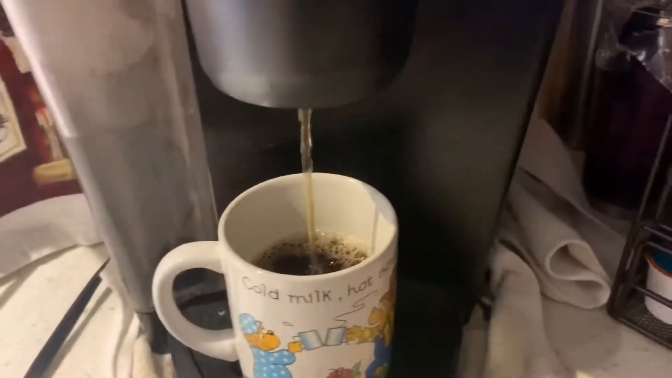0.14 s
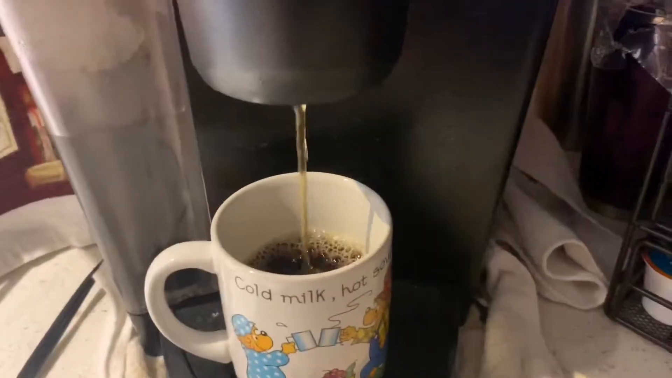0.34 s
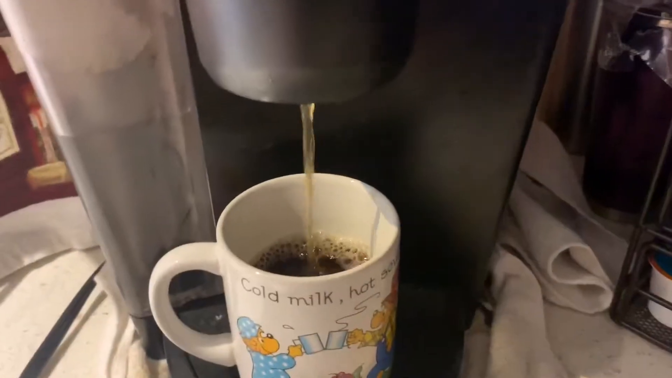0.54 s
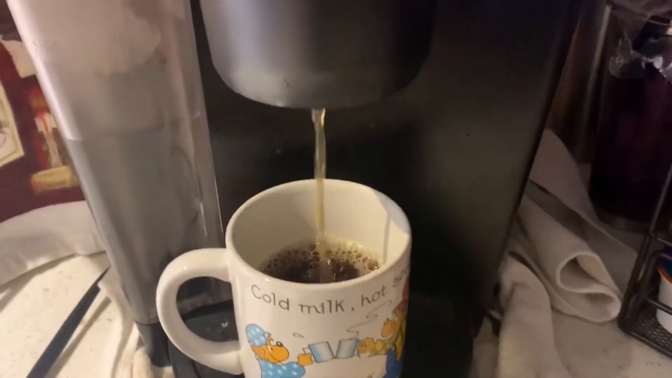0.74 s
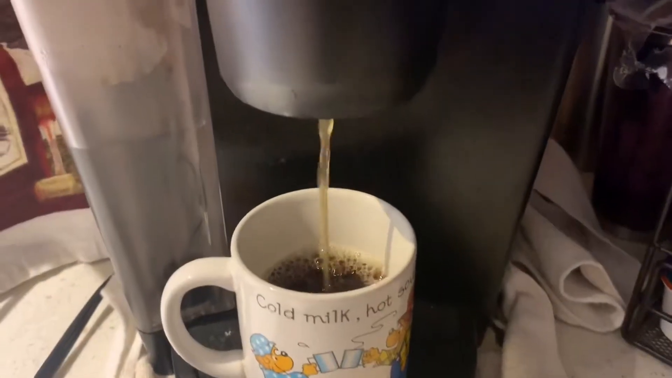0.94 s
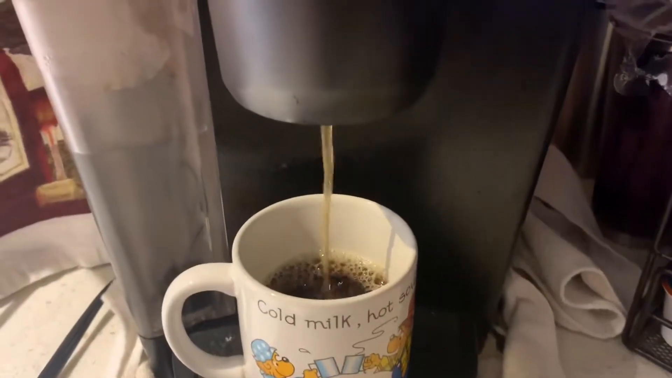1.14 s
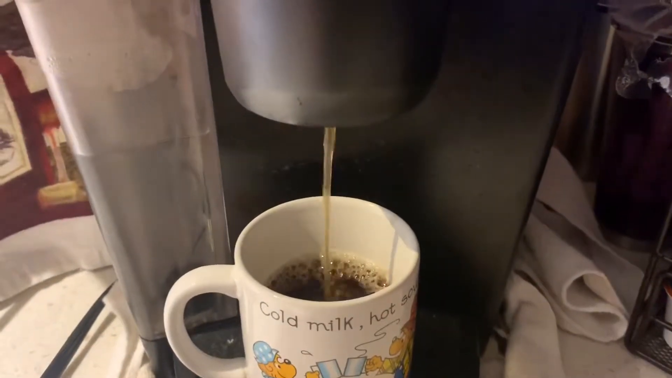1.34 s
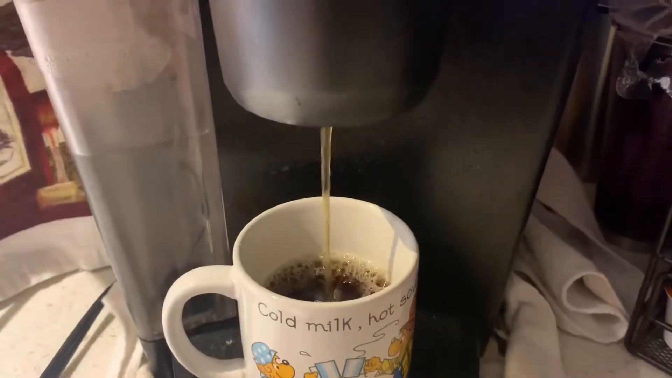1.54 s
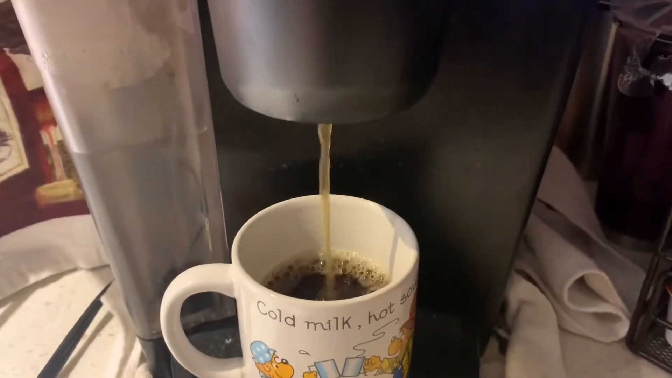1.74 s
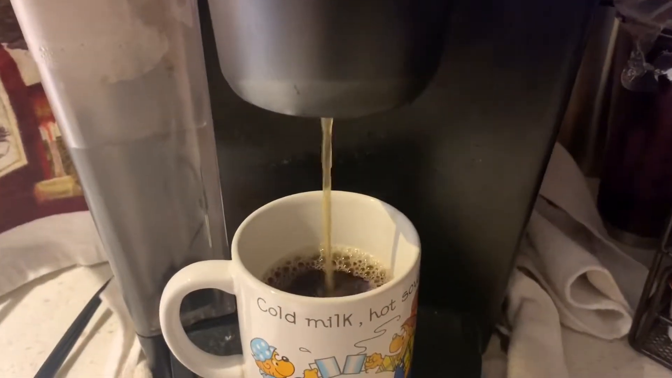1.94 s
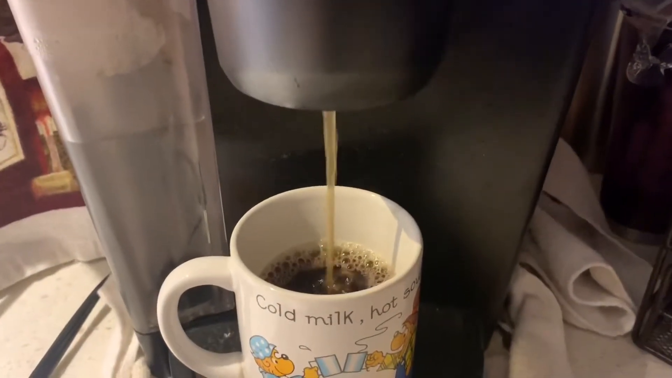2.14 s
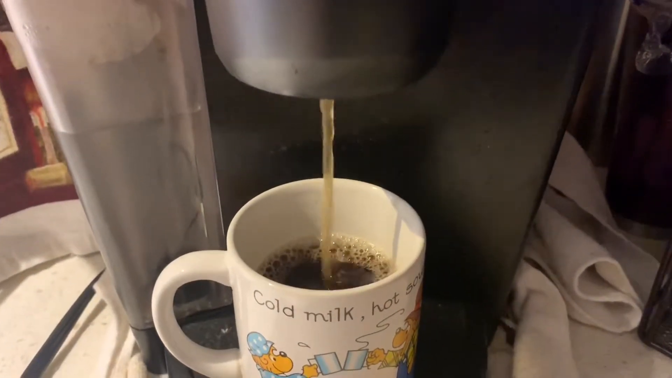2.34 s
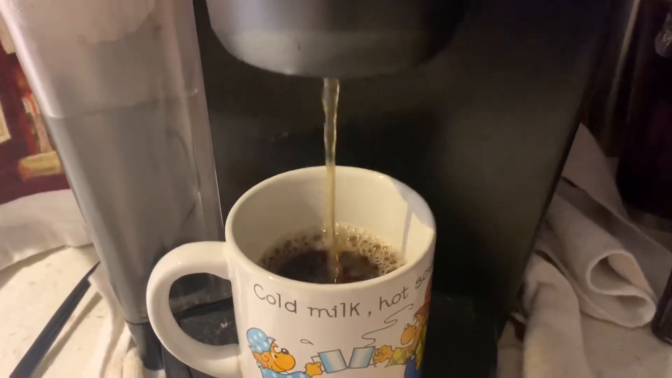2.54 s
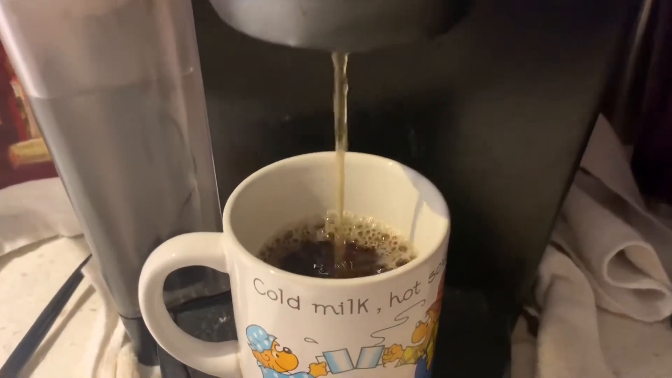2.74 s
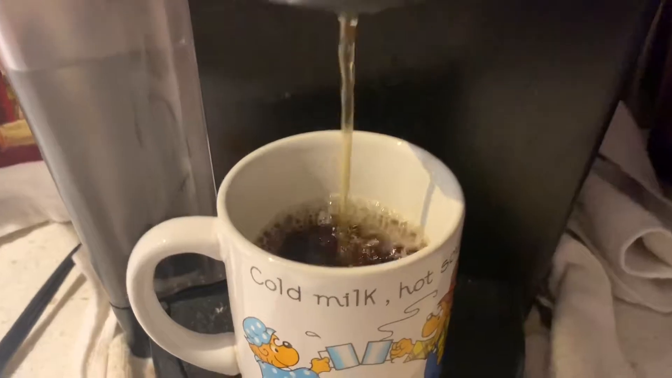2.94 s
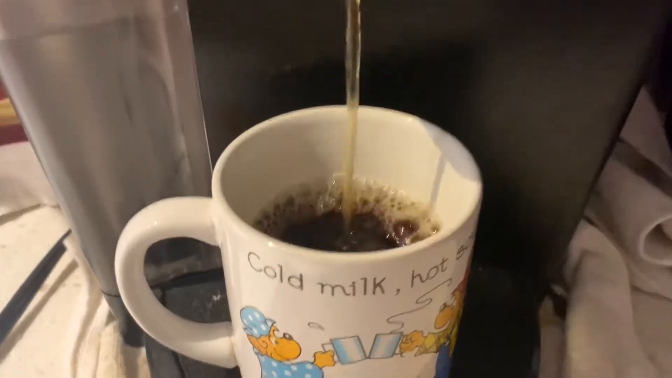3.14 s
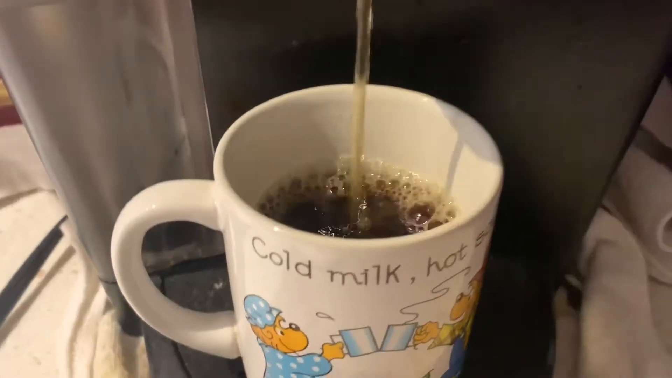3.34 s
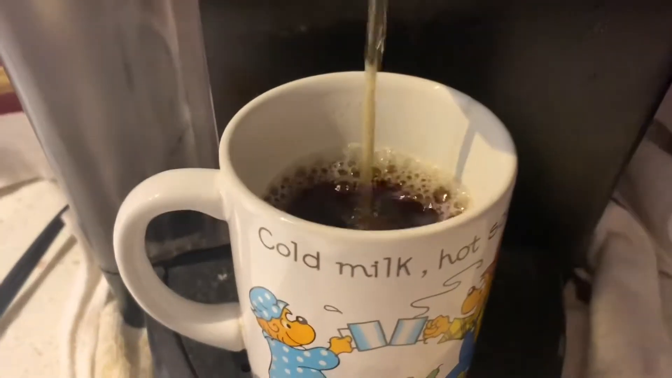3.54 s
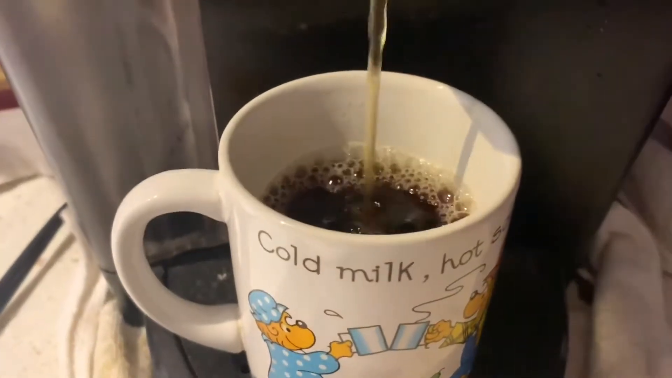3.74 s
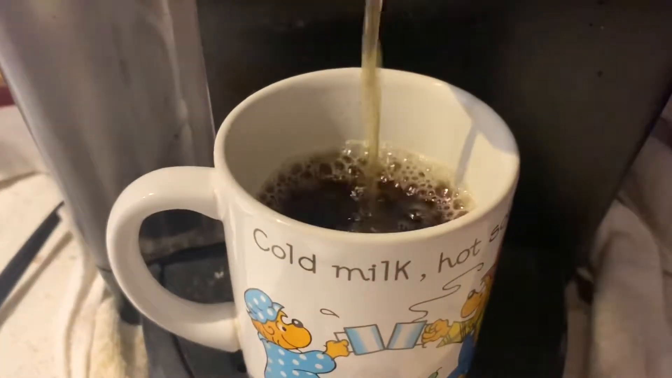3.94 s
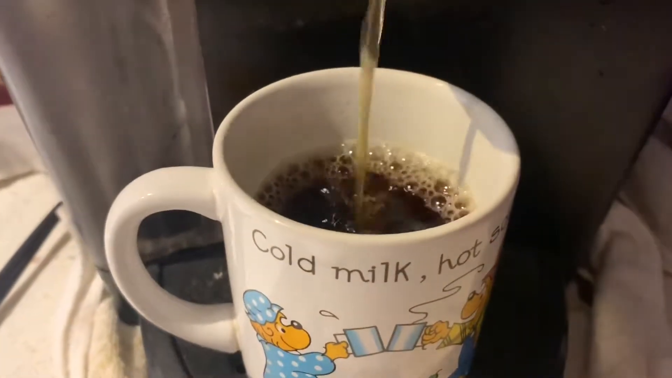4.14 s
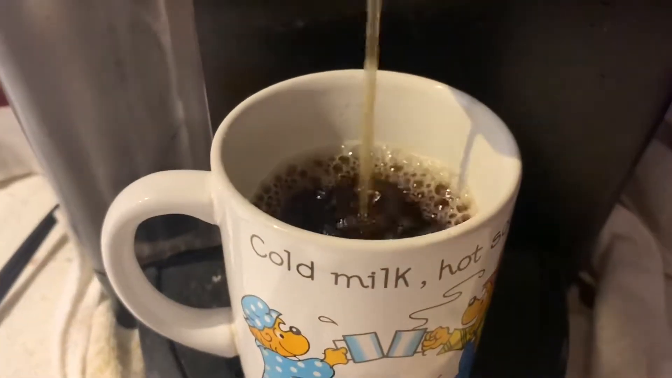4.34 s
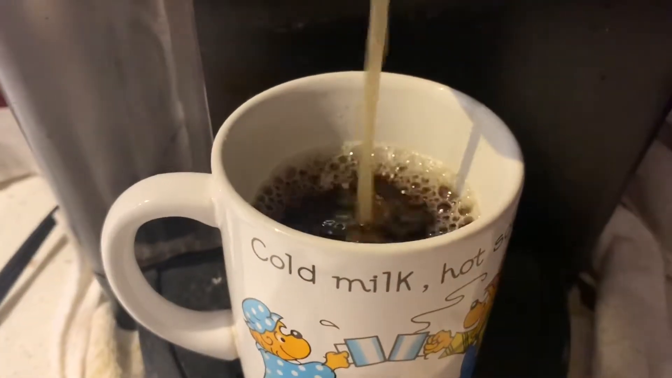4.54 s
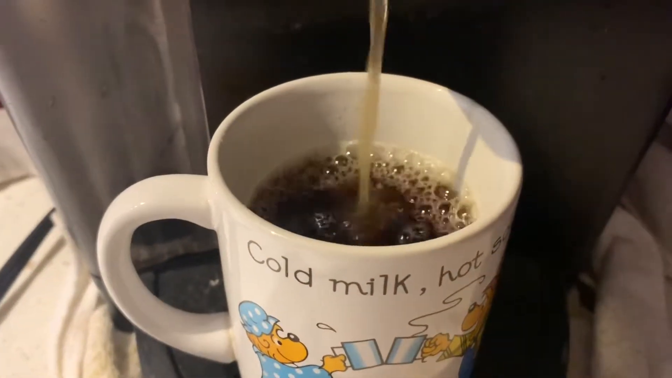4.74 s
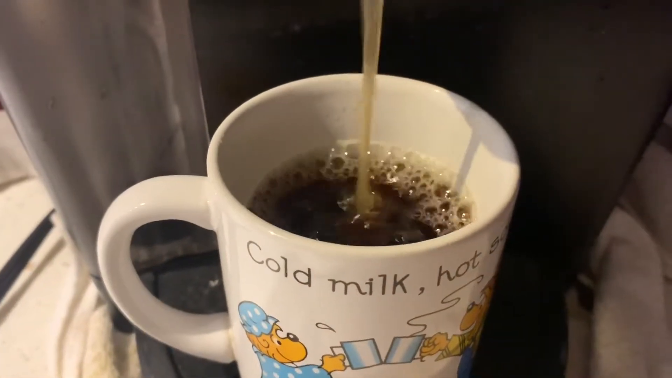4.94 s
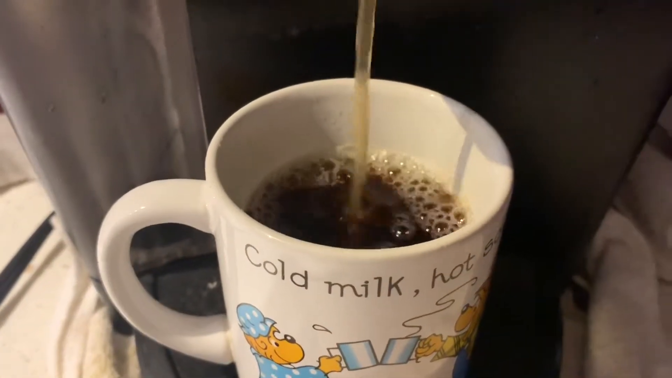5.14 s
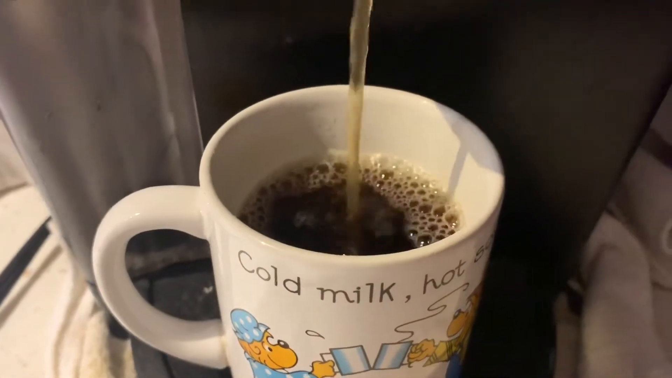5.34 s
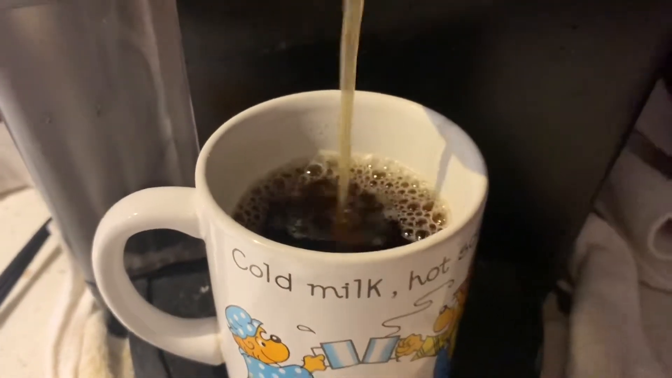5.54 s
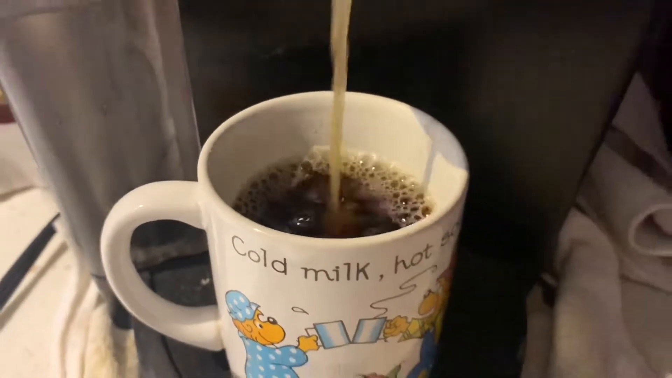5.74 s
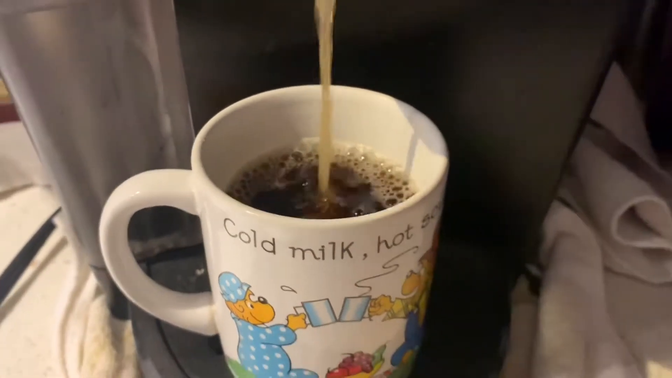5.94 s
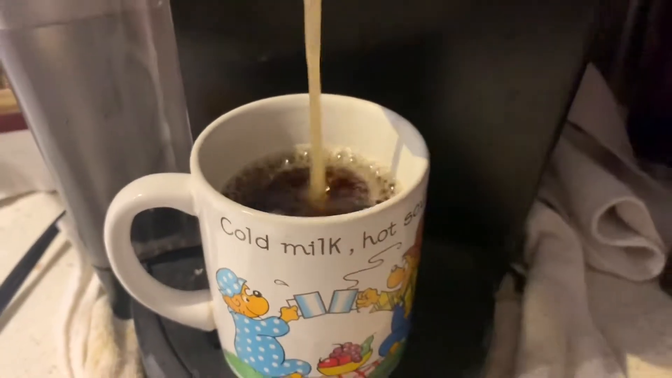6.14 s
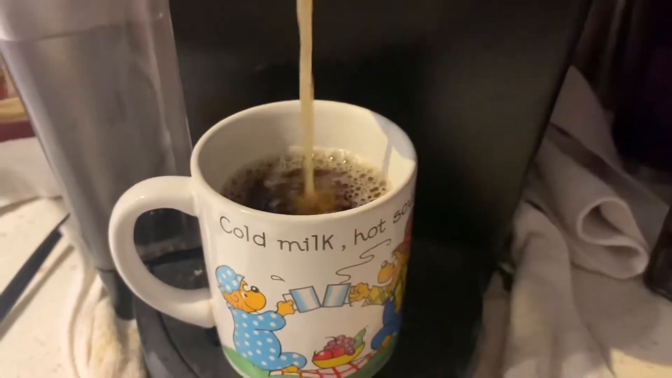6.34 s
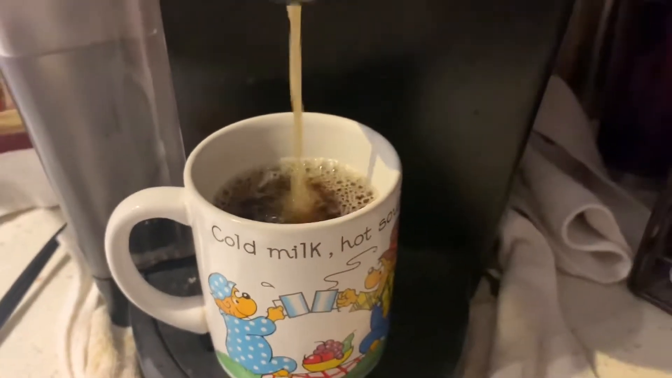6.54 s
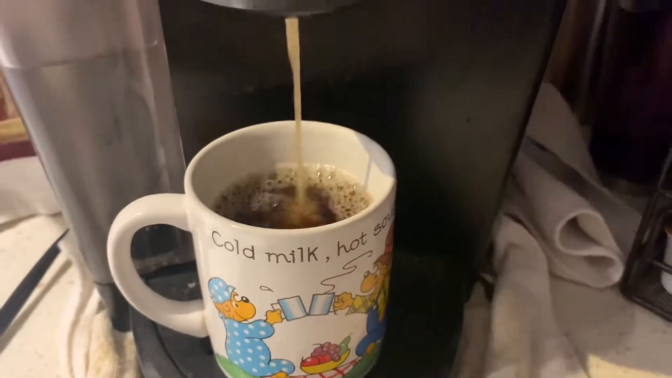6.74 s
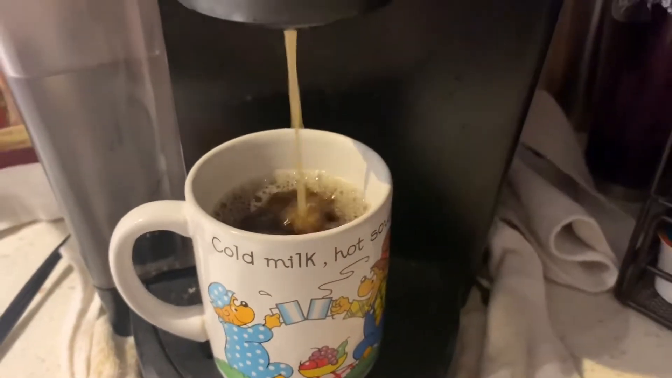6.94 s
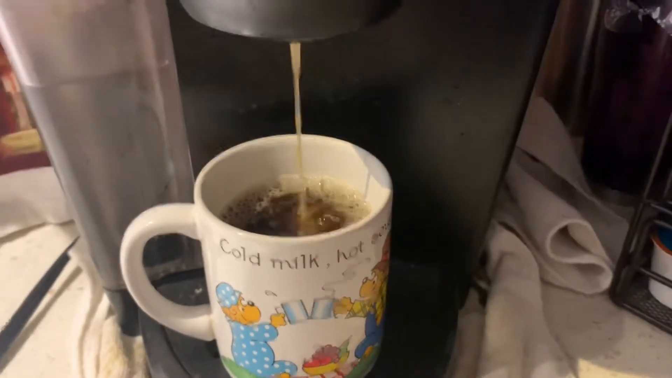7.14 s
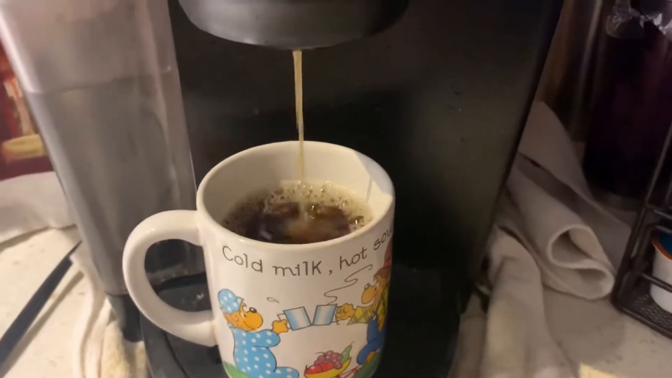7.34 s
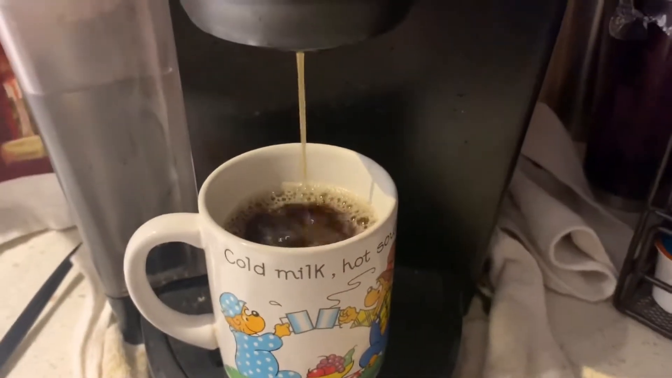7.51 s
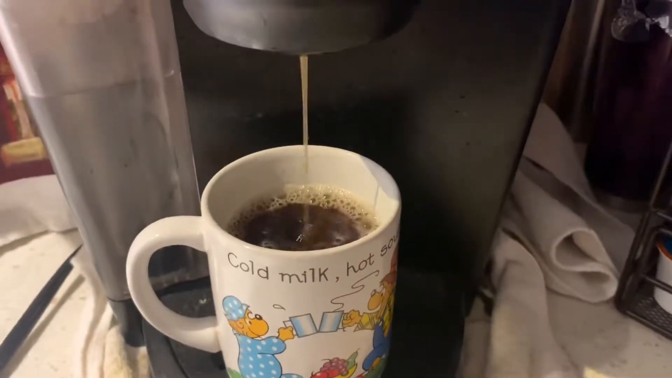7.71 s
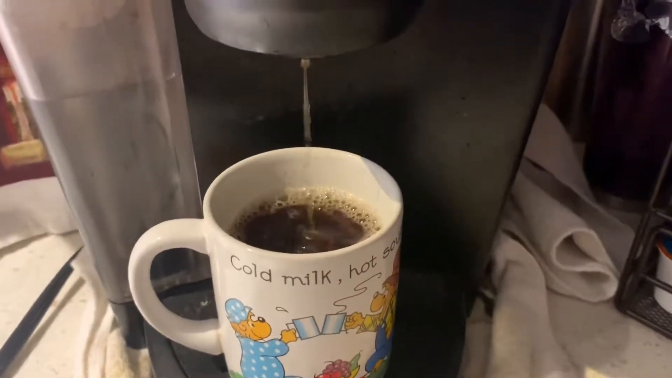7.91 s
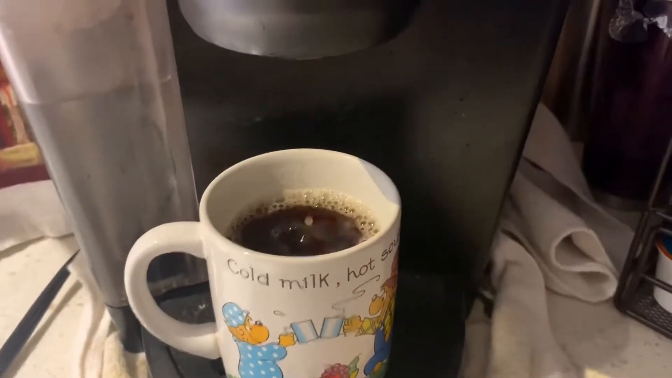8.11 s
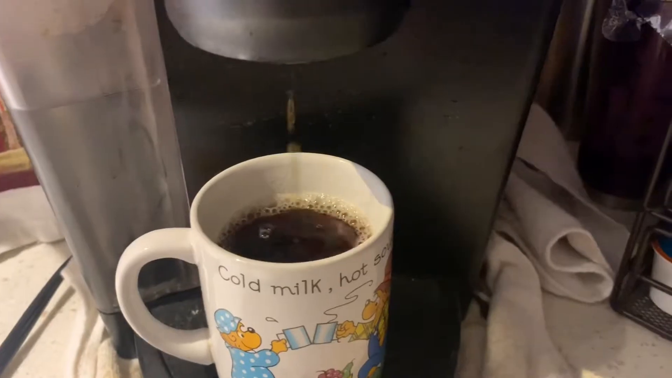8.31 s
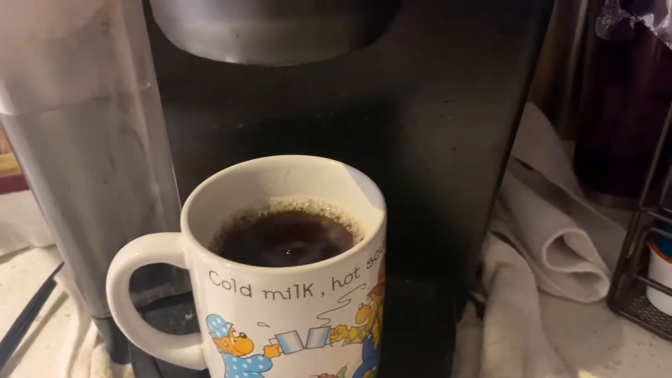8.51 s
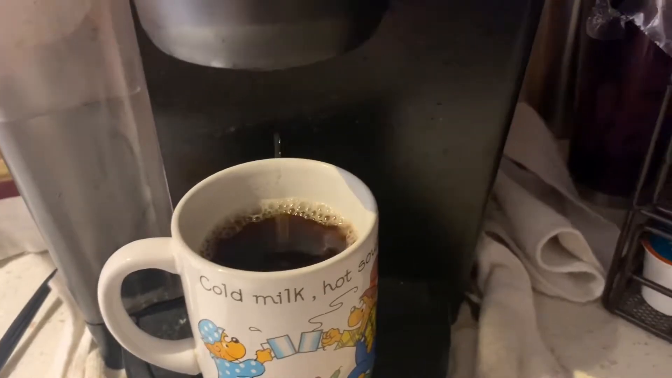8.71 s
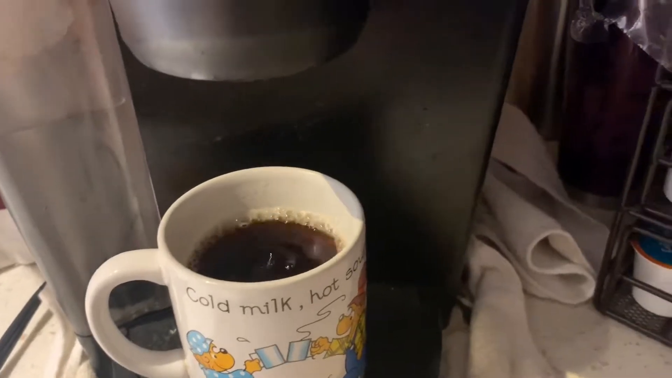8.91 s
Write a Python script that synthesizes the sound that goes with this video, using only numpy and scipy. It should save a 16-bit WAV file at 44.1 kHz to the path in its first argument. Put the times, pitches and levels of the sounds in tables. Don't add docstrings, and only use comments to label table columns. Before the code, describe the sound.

A thin stream of coffee trickles softly into a ceramic mug, with hollow little gulps, plips and crisp crackles of bursting froth. Brief airy spurts break in around the middle, then trapped air blasts out in a loud, rough, hissing roar for under two seconds. It cuts off sharply, leaving faint drips, a quick soft motor tick, two late spits and low kitchen rumble. Close stereo phone microphone, small dry indoor space.

```python
import sys
import numpy as np
from scipy import signal
from scipy.fft import rfft, irfft, next_fast_len
from scipy.io import wavfile
from scipy.ndimage import uniform_filter1d

SR = 44100
rng = np.random.default_rng(int(sys.argv[2]) if len(sys.argv) > 2 else 0)


def voltage_ratio(level):
    return 10 ** (np.asarray(level, float) / 20)


def to_wav(s):
    ch = np.atleast_2d(s).T
    pcm = np.round(np.clip(ch, -1, 1) * 32767)
    wavfile.write(sys.argv[1], SR, pcm.astype(np.int16))


N = 399987
T = np.arange(N) / SR
SIZE = next_fast_len(N + SR // 2)
HZ = np.arange(SIZE // 2 + 1) * SR / SIZE
COARSE = HZ[::16]
TOP = 1 / (1 + (HZ / 15750) ** 200)

# [t/s, level/dB]
TRICKLE = [
    (0, -88),
    (.45, -54.5),
    (1, -54.5),
    (2.2, -60),
    (3.5, -52.5),
    (4.7, -48.5),
    (5.4, -52.5),
    (5.68, -45),
    (5.86, -35),
]
# [t/s, level/dB]
PURGE = [
    (5.9, -37),
    (5.97, -24.5),
    (6.2, -19),
    (6.45, -21),
    (6.62, -20),
    (6.93, -20.5),
    (7.1, -21),
    (7.4, -24),
    (7.661, -25),
]
# [t/s, duration/s, level/dB]
SURGES = [
    (4.109, 0.11, -36.5),
    (4.274, 0.043, -28),
    (5.406, 0.056, -33),
    (5.48, 0.14, -34),
    (5.686, 0.12, -34),
]
# [t/s, depth/dB, length/s]
CHOKES = [(6.014, 2.5, 0.017), (6.134, 3.5, .02), (6.275, 8.5, 0.011), (6.41, 2.5, 0.017), (6.65, 3, 0.017),
          (6.742, 1, 0.012), (6.783, 2.5, 0.026), (6.843, 4, 0.018), (6.883, 4.5, 0.0067), (6.96, 2, 0.049),
          (7.066, 0.5, 0.01), (7.145, 2, 0.013), (7.284, 2, 0.04), (7.457, 1, 0.017), (7.52, 2.5, 0.014),
          (7.632, 1.5, 0.02)]
# [t/s, hiss over roar/dB]
CLEARING = [
    (3.9, -14),
    (4.1, -14),
    (5.3, -6),
    (5.45, -16.5),
    (6.0, -16.5),
    (6.2, -9),
]
# [f/Hz, width/Hz, level/dB, left minus right/dB, right lag/rad]
MODES = [(517, 47, -16.5, 1, 0.56), (678, 42, -5, 2, 0.25), (793, 56, -7, 6.5, -0.2),
         (948.6, 44, -3, -1, -0.27), (1059, 48, 1.5, 2.5, 0.56), (1096, 59, -8, -7.5, -1),
         (1236, 37, -7, 13.5, -2), (1385, 51, -13.5, 6.5, -0.5), (1543, 65, -9.5, 13, -0.5),
         (1623, 132, -15, -6.5, -2), (1744, 63, -17.5, -3.5, -1.5), (1854, 164, -18, -3, -2.0),
         (1992, 32.5, -22.5, 4.5, 3.5), (2106, 35, -14.5, 4.5, 3.5),
         (2323, 69, -15, 1, 2.26), (2343, 33, -21.5, 6, 2.4), (2430, 13, -20.5, -11, 1.5),
       (2552, 66, -17.5, 0, -0.9), (2649, 80, -16, 7.5, -0.3), (2722, 62, -20, 5, -1.5),
       (3070, 87, -20.5, 0.5, 2), (3300, 180, -23.5, -2.5, 2), (3770, 43, -22, 4, -1.2),
       (4160, 160, -25.5, 2, 1.8), (4870, 950, -32.5, 0, -2), (5750, 150, -38.5, -17, -1.9),
       (6110, 124, -41, -1, 1), (6460, 107, -14.5, -5.5, 3)]
# [lowest f/Hz, change as the phone draws back/dB, own flutter/dB]
PARTS = [(0, 2, 1.5), (740, 1.5, 2), (1000, -3.5, 1), (1150, -1, 2), (1700, 2.5, 2), (2250, 0.5, 0.44),
         (2900, -2, 1.3)]
BACK_S = [6.8, 7.42]
# [f/Hz, width/Hz, level/dB]
NEEDLE = [(8000, 330, -7.5), (8300, 83, 9.5), (8540, 1000, -1.5), (10200, 170, -3), (11050, 2700, -12.5),
          (13600, 1600, -14), (16100, 1100, -14.5)]
# [t/s, peak level/dB, t60/s]
SPURTS = [(4.139, -31, 0.12), (4.179, -14.5, 0.082), (4.24, -25, 0.088), (4.304, -14, 0.054),
          (5.385, -15.5, 0.059), (5.419, -22.5, 0.11), (5.503, -11.5, 0.049), (5.597, -15, 0.054),
          (5.621, -8.5, 0.047), (5.689, -20.5, 0.094), (5.773, -13, 0.031), (5.868, -13, 0.032),
          (5.905, -28.5, 0.038), (5.941, -60, 0.12), (8.374, -23.5, 0.09), (8.721, -16, 0.04)]
# [t/s, peak level/dB, t60/s]
GLUGS = [(0.414, -36, 0.059), (0.451, -31.5, 0.059), (0.541, -27.5, 0.047), (0.901, -30, 0.035),
         (1.022, -37.5, 0.18), (1.142, -32, 0.096), (1.954, -35, 0.11), (2.087, -35.5, 0.08),
         (2.707, -24.5, 0.04), (2.793, -33.5, 0.064), (2.897, -28.5, 0.038), (3.427, -29.5, 0.084),
         (3.488, -32.5, 0.038), (4.38, -24, 0.025), (4.429, -20.5, 0.032), (4.47, -26, 0.033),
         (4.53, -39, 0.077), (4.754, -23.5, 0.025), (4.817, -25, 0.042), (4.87, -24, 0.021),
         (5.018, -23, 0.079), (5.159, -19, 0.07), (5.342, -23, 0.03), (5.821, -18.5, 0.041),
         (7.781, -36, 0.078), (7.935, -37, 0.082), (8.406, -14.5, 0.021), (8.775, -33.5, 0.1)]
# [t/s, peak level/dB, f/Hz, t60/s]
GULPS = [(0.04, -38.5, 937, 0.14), (0.156, -28.5, 1490, 0.022), (0.823, -29.5, 880, 0.026),
         (1.057, -33, 1000, 0.077), (1.074, -24, 1080, 0.033), (1.272, -27.5, 1320, 0.022),
         (1.524, -24, 987, 0.05), (1.769, -34, 1330, 0.061), (1.816, -31.5, 1160, 0.068),
         (2.269, -30, 1094, 0.041), (2.492, -24.5, 1370, 0.033), (2.519, -39, 1056, 0.12),
         (2.641, -26, 920, 0.035), (2.912, -17, 920, 0.029), (2.944, -19, 1030, 0.03),
         (3.17, -28.5, 1066, 0.039), (3.213, -22.5, 865, 0.026), (3.307, -20.5, 1260, 0.042),
         (3.368, -45.5, 990, 0.25), (3.505, -24.5, 1210, 0.036), (3.527, -25.5, 920, 0.036),
         (3.735, -22, 1005, 0.054), (3.809, -20.5, 830, 0.013), (3.886, -26.5, 1210, 0.05),
         (3.967, -24.5, 860, 0.033), (4.02, -32, 1025, 0.057), (4.525, -44, 1850, 0.045),
         (4.559, -20.5, 1345, 0.033), (4.742, -40, 1820, 0.069), (5.222, -28, 1220, 0.018)]
# [t/s, peak level/dB]
SNAPS = [(0.341, -30), (0.414, -31), (0.5368, -18.5), (0.641, -39), (0.901, -30), (1.0206, -32.5),
         (1.3056, -34), (1.393, -30), (1.625, -33), (1.9887, -22.5), (2.057, -32), (2.302, -33),
         (2.446, -35), (2.4796, -24), (2.562, -19.5), (2.5846, -27), (2.6413, -11), (2.792, -18.5),
         (2.911, -23.5), (3.0394, -34), (3.3666, -28), (3.4394, -26.5), (3.5276, -32), (3.8163, -35),
         (4.1537, -19), (4.19, -13.5), (4.311, -20.5), (4.378, -21), (5.689, -25.5), (0.537, -20),
         (3.3395, -40), (3.7391, -44), (4.2723, -34), (4.412, -36), (4.4909, -43), (4.5392, -39),
         (4.5777, -39), (4.7602, -40), (4.8036, -42), (5.2017, -44), (5.2232, -37), (0.7911, -41),
         (0.9687, -49), (1.0735, -47)]
# [t/s, peak level/dB]
SPLATS = [(0.126, -34), (0.145, -28), (0.364, -32.5), (0.451, -29), (0.504, -33), (0.607, -23),
          (0.697, -25.5), (0.9216, -33), (1.2157, -24), (1.228, -22.5), (1.418, -29.5), (1.9638, -29),
          (2.101, -29.5), (2.382, -28.5), (2.706, -31), (2.74, -32.5), (2.942, -29.5), (3.19, -24),
          (3.21, -26.5), (3.3063, -21.5), (4.001, -31), (4.104, -30), (4.137, -21.5), (4.24, -28),
          (4.288, -26), (4.8816, -29), (4.914, -29.5), (5.045, -26), (5.497, -31), (5.623, -27)]
# [t/s, peak level/dB]
SPLASHES = [(0.027, -42.5), (0.757, -38.5), (0.823, -39.5), (1.034, -48), (1.195, -35), (2.268, -34.5),
            (2.855, -40), (2.8676, -33), (2.878, -42), (2.968, -39), (3.288, -40), (3.421, -42),
            (3.504, -43), (3.6647, -41), (4.1715, -30), (4.458, -41), (4.609, -38), (4.631, -37.5),
            (4.951, -38), (5.1334, -34), (5.758, -32)]
# [t/s, peak level/dB]
TICKS = [(0.0473, -39), (0.1002, -37.5), (0.2119, -40), (0.6723, -37), (1.1946, -48), (1.333, -37),
         (1.372, -41), (1.5253, -40), (1.5984, -33.5), (1.655, -43), (1.71, -51.5), (1.7679, -50),
         (1.8731, -41), (1.93, -41), (2.044, -38), (2.1212, -38), (2.1344, -50), (2.146, -39),
         (2.2583, -51), (2.2717, -58), (2.37, -50), (2.4079, -47), (2.8419, -42), (2.9936, -38),
         (3.3946, -41), (3.475, -38), (3.869, -33), (3.983, -43), (4.022, -32.5), (4.4283, -38.5),
         (4.56, -40), (4.683, -38), (4.7185, -33), (5.0186, -41), (5.161, -39), (5.386, -58), (7.79, -39.5),
         (7.8215, -44), (7.9163, -41), (7.9734, -43.5), (8.0576, -47.5), (8.407, -40.5), (8.7213, -63),
         (0.183, -46), (0.263, -41), (0.3107, -55), (0.3765, -38), (0.561, -33), (0.614, -34),
         (0.7085, -45), (0.856, -38), (1.285, -41), (2.0777, -41), (2.597, -45), (2.604, -51), (2.772, -42),
         (3.2362, -40), (3.2637, -39), (3.4577, -40), (4.117, -28)]
# [f/Hz, level/dB]
FIZZ = [(3000, -20), (5000, -19), (7000, -1), (9000, -6), (11500, -1.5), (14000, -6), (15700, -8),
        (16200, -13)]
# [t/s, peak level/dB, f/Hz]
BLIPS = [(0.1296, -36, 1860), (0.449, -38, 2580), (0.488, -33, 1890), (0.611, -47, 2750),
         (0.825, -34, 1850), (1.4222, -37, 1970), (1.5787, -37, 1810), (1.7712, -30, 2625),
         (1.955, -31.5, 1710), (2.384, -53, 2330), (2.8598, -32.5, 2430), (3.177, -39, 2540),
         (3.2107, -35, 2340), (3.3069, -31.5, 2400), (3.441, -41, 1930), (3.8495, -39, 2330),
         (4.109, -38, 2570), (4.2497, -31, 1960), (4.5287, -35, 1800), (4.5605, -31, 2290),
         (4.609, -28, 2340), (4.8825, -37, 2430), (5.017, -31.5, 2240), (5.128, -37, 2640),
         (5.158, -33, 2520), (4.55, -41, 2050), (4.582, -40, 2000), (4.652, -40, 1760), (4.712, -40, 1760),
         (4.73, -39, 1740), (4.756, -43, 1770), (4.778, -36, 2360), (4.94, -39, 2020), (5.045, -42, 2290),
         (0.26, -45, 2000), (0.505, -38, 2730), (0.57, -38, 2050), (0.645, -33, 1500), (0.86, -41, 1460),
         (1.065, -37, 2450), (1.15, -52, 2720), (2.535, -39, 3800), (2.56, -35, 1550)]
# [t/s, peak level/dB, f/Hz]
DRIPS = [
    (7.7912, -42.5, 2480),
    (7.8221, -54, 2770),
    (7.9159, -54, 4100),
    (7.9323, -48, 2000),
    (7.9743, -44, 2520),
]
# [t/s, f of the 51st multiple/Hz, level/dB]
MOTOR = [
    (7.87, 1707, -55),
    (8.3, 1714, -55),
    (9.07, 1718, -55),
]
# [f/Hz, level/dB]
WHINE = [(506.0, -58), (672.9, -56.5), (807.5, -60), (958.2, -62), (1093, -61.5), (1244, -70)]
# [t/s, throb level/dB, tank hum level/dB]
PUMP = [
    (0.0, -40, -61),
    (0.07, -53, -49),
    (3.74, -51, -47.5),
    (4.14, -49, -42.5),
    (8.82, -55, -46),
    (9.07, -47, -46.5),
]
# [f/Hz, level per Hz/dB]
KITCHEN = [(12, -44), (22, -41), (40, -13), (93, 1.5), (130, -1.5), (228, -7), (459, -16), (690, -15),
           (980, -23.5), (1700, -19), (2300, -29.5), (2850, -28), (5000, -44), (16000, -44.5)]
# [f/Hz, left-right likeness]
ALIKE = [(20, 0.57), (150, -0.1), (300, 0.68), (900, 0.46), (1500, -0.14), (3000, -0.84), (6500, -0.63)]

LATE_S = 7.7


def unit(x):
    return x / np.sqrt(np.mean(x ** 2))


def shape(table):
    hz, value = np.transpose(table)
    return np.interp(np.log(HZ + 1), np.log(hz), value)


def through(x, response):
    return irfft(rfft(x, SIZE) * response, SIZE)[..., :N]


def mode(hz, width, f=HZ):
    damping = 1.5j * f * width
    return (damping / (hz ** 2 - f ** 2 + damping)) ** 2


def walk(rate):
    k = int(SR / rate)
    held = np.repeat(rng.standard_normal(N // k + 1), k)
    return 1.26 * uniform_filter1d(uniform_filter1d(held, k), k)[:N]


def add(track, s, sound):
    i = int(s * SR)
    track[i:i + len(sound)] += sound[:N - i]


def rush():
    cut_s, cut_db_per_s, edge_s = PURGE[-1][0], 235, 0.027
    purge_db = np.interp(T, *np.transpose(PURGE), left=-99)
    purge_db = purge_db - cut_db_per_s * np.maximum(T - cut_s, 0)
    trickle_db = np.interp(T, *np.transpose(TRICKLE))
    air = voltage_ratio(purge_db) + voltage_ratio(trickle_db) * (T < PURGE[1][0])
    for s, length, db in SURGES:
        to_edge = np.minimum(T - s, s + length + edge_s - T)
        air = air + voltage_ratio(db) * np.clip(to_edge / edge_s, 0, 1)
    flutter_db = np.clip(.5 * walk(40) + 1.3 * walk(160), -3, 2.5)
    for s, db, length in CHOKES:
        flutter_db = flutter_db - db * np.exp(-((T - s) / length) ** 2)
    hiss_db = np.interp(T, *np.transpose(CLEARING)) + 0.5 * flutter_db
    hiss_db = hiss_db + 1.95 * walk(90) + 1.3 * (T < 5.3) * walk(50)
    return air * voltage_ratio(flutter_db), air * voltage_ratio(hiss_db)


def body(x):
    parts = np.zeros((len(PARTS), 2, len(COARSE)), complex)
    for hz, width, db, pan, lag in MODES:
        k = sum(hz >= part[0] for part in PARTS[1:])
        left = voltage_ratio(db + pan / 2)
        right = voltage_ratio(db - pan / 2) * np.exp(-1j * lag)
        parts[k] += np.array([[left], [right]]) * mode(hz, width, COARSE)
    parts /= np.sqrt(np.mean(abs(parts.sum(axis=0).mean(axis=0)) ** 2))
    back, out = np.interp(T, BACK_S, [0, 1]), 0
    for part, (_, back_db, own_db) in zip(parts, PARTS):
        push = rfft(x * voltage_ratio(back_db * back + own_db * walk(55)), SIZE)
        out = out + push * np.array([np.interp(HZ, COARSE, side) for side in part])
    return irfft(out, SIZE)[:, :N]


def needle():
    both = sum((-1) ** k * voltage_ratio(db) * mode(hz, width) for k, (hz, width, db) in enumerate(NEEDLE))
    return both / np.sqrt(np.mean(abs(both) ** 2))


def pockets():
    rows = [(s, db, 665, t60, -16.5) for s, db, t60 in GLUGS]
    rows += [(s, db, 1040, t60, -18.5) for s, db, t60 in SPURTS]
    rows += [(*row, -22) for row in GULPS]
    late_hiss_db = -14.5
    return [(*row[:4], row[4] if row[0] < LATE_S else late_hiss_db) for row in rows]


def bubble(hz, fade, climb):
    t = np.arange(len(fade)) / SR
    churn = np.cumsum(.035 * rng.standard_normal(len(t)))
    return fade * np.sin(2 * np.pi * hz * t * (1 + climb * t) + churn)


def gulps():
    ring, splash, spit, hiss = np.zeros((4, N))
    t = np.arange(SR // 4) / SR
    for s, db, hz, t60, hiss_db in pockets():
        rise_s = .0045 if s >= 4.1 and t60 >= .04 else 0.0007
        fade = voltage_ratio(db + 3.5 - 60 * t / np.clip(t60, .02, .3)) * (1 - np.exp(-t / rise_s))
        fade = fade * voltage_ratio(2.5 - 12.4 * (t / t60 / 0.55) ** 2)
        ring_gain = .42 if s < LATE_S else .08
        splash_gain = .45 if s < 5.3 else .15 if s < LATE_S else .06
        spit_gain = 4.2 if s < 5.6 else 6.5 if s < LATE_S else 9.0
        add(ring, s, ring_gain * bubble(hz, fade, 0.81))
        add(splash, s, splash_gain * fade)
        add(spit, s, spit_gain * t60 * fade)
        add(hiss, s, 0.27 * fade * voltage_ratio(hiss_db))
    fat_drop = voltage_ratio(-26 - 60 * t / .13) * (1 - np.exp(-t / .008))
    add(ring, 7.935, bubble(260, fat_drop, 1.2))
    liquid = mode(1360, 500) + 1.06 * mode(1100, 490) + 0.16 * mode(2600, 650)
    splash = through(splash * rng.standard_normal(N), liquid)
    return ring + splash, spit, hiss


def tear(t):
    noise = rng.standard_normal(len(t))
    film = noise + (1.5 * rng.random() - .8) * np.roll(noise, 1)
    hz = 8000 * 1.553 ** rng.random()
    note = np.sin(2 * np.pi * hz * t) * np.exp(-((t - .0014) / 0.00013) ** 2)
    echo_s, echo_db = .00045, -4
    note = signal.lfilter([1], np.r_[1, np.zeros(int(echo_s * SR)), -voltage_ratio(echo_db)], note)
    tail = 0.09 * np.exp(-t / 0.0067) * np.minimum(t / 0.0019, 1)
    return 0.77 * film * (np.exp(-((t - .0017) / 0.0011) ** 2) + tail) + note


def froth():
    crack, slap = np.zeros((2, N))
    t = np.arange(SR // 40) / SR
    for films, slap_db in [(SNAPS, -22.5), (SPLATS, -2), (SPLASHES, 8), (TICKS, 1.5)]:
        for s, db in films:
            add(crack, s - .001, voltage_ratio(db + 1.0) * tear(t))
            add(slap, s, voltage_ratio(db + slap_db - 12.0) * rng.standard_normal(len(t)) * np.exp(-t / 0.014))
    at, big, sign = rng.random((3, N))
    bursts = at < 130 / SR * voltage_ratio(4.0 * walk(11))
    small = bursts * np.minimum(voltage_ratio(-4.5 * np.log(big)), 3.5) * np.sign(sign - .5)
    small = small * np.interp(T, [0, 4.5, 5.5, 7.7, 7.9], [0.37, 0.55, 0.97, 0.17, 0.027])
    puff = np.exp(-t / 0.0056) * (1 - np.exp(-t / 0.002))
    small = through(abs(small), rfft(puff, SIZE)) * rng.standard_normal(N)
    fizz = voltage_ratio(shape(FIZZ))
    slap = through(slap, mode(1680, 2300) + 0.5 * mode(3230, 5400))
    small = through(small, (voltage_ratio(-56) * fizz + voltage_ratio(-51.5) * mode(3000, 2700)) * TOP)
    return through(crack, fizz) + slap + small


def plips(count=700):
    out, t = np.zeros(N), np.arange(SR // 40) / SR
    for at, pitch, big in rng.random((count, 3)):
        hz = 650 * (5.5 if at < .8 else 3.) ** pitch ** .7
        size_db = -50.5 - 4 * pitch + min(-3.5 * np.log(big), 8)
        fade = voltage_ratio(size_db - 60 * t * hz / 20) * np.minimum(t / .0015, 1)
        add(out, 5.4 * at, bubble(hz, fade, .6))
    stream_db = np.interp(T, [0, 2.4, 3, 4.3, 4.5, 5.4], [12.0, 0.49, 2.5, 11, 14.0, 7.6])
    out = out * voltage_ratio(stream_db + 1.5 * walk(25))
    for (s, db), pitch in zip(SPLASHES, rng.random(len(SPLASHES))):
        fade = voltage_ratio(db - 8 - 60 * t / .018) * np.minimum(t / .001, 1)
        add(out, s, bubble(1700 * 2.3 ** pitch, fade, 1.5))
    for s, db, hz in BLIPS:
        add(out, s, bubble(hz, voltage_ratio(db - 4.0 - 60 * t / 0.046) * np.minimum(t / 0.00042, 1), 0.78))
    for s, db, hz in DRIPS:
        add(out, s, bubble(hz, voltage_ratio(db - 60 * t / 0.036) * np.minimum(t / 0.0012, 1), 5.3))
    return out


def walls(x, t60=0.075, db=-13):
    t = np.arange(SR // 3) / SR
    echo = rng.standard_normal((2, len(t))) * voltage_ratio(-60 * t / t60) * (t > .003)
    echo = rfft(echo / np.sqrt(np.sum(echo ** 2) / 2), SIZE) * HZ / (HZ + 1200)
    return x + voltage_ratio(db) * through(x, echo)


def emerging():
    return np.interp(T, [7.6, 7.85], [.15, 1])


def ticks():
    s, hz, _ = np.transpose(MOTOR)
    turns = np.cumsum(np.interp(T, s, hz) / 51 / SR)
    turns = np.floor(turns - turns[int(8.458 * SR)])
    return unit(np.diff(turns, prepend=turns[0])) * emerging()


def motor():
    cover = mode(1712, 46) + .25 * mode(1650, 150) + .1 * mode(1450, 300)
    cover = cover + .05 * mode(2280, 60) + .2 * mode(690, 200)
    whine = sum(voltage_ratio(db + .5 + 2.2 * walk(20)) * np.sin(2 * np.pi * hz * T) for hz, db in WHINE)
    ring = through(ticks(), cover)
    ring = ring / np.std(ring[-SR:]) * voltage_ratio(MOTOR[0][2] - 2.0) * np.array([[1.3], [.9]])
    return ring + whine * emerging()


def pump():
    s, throb_db, tank_db = np.transpose(PUMP)
    mid, side = rng.standard_normal((2, N))
    noise = mid + 0.13 * side * np.array([[1], [-1]])
    stroke = 0.31 * mode(29.0, 14.0) + mode(51.0, 12.0) + 0.57 * mode(75.8, 15.0) + 0.73 * mode(98.1, 5.1)
    water = mode(234.5, 25.4) + 0.64 * mode(206, 24.0) + 0.48 * mode(274.6, 71.0)
    throb = unit(through(noise, stroke)) * voltage_ratio(np.interp(T, s, throb_db) + 2.0)
    return throb + unit(through(noise, water)) * voltage_ratio(np.interp(T, s, tank_db) - 0.5)


def kitchen():
    alike, out = np.clip(shape(ALIKE), -.99, .99), 0
    noise = rfft(rng.standard_normal((2, SIZE))) * voltage_ratio(shape(KITCHEN))
    mid, side = noise * np.sqrt([1 + alike, 1 - alike])
    both = np.array([mid + side, mid - side])
    for hz in 30 * 4.5 ** np.arange(6):
        band = np.cos(np.pi / 2 * np.clip(np.log2((HZ + 1) / hz) / 2, -1, 1)) ** 2
        out = out + voltage_ratio(1.4 * walk(2.83)) * irfft(both * band, SIZE)[:, :N]
    return through(unit(out), HZ ** 2 / (HZ ** 2 + 200 ** 2) * TOP) * voltage_ratio(-41)


def scene():
    roar, hiss = rush()
    ring, spit, puff = gulps()
    air, jet = rng.standard_normal((2, N))
    dull = through(air, 1 / (1 + (HZ / 1900) ** 2))
    air = np.where(T < LATE_S, air, dull)
    low = body(air * (roar + spit) + voltage_ratio(-62) * ticks())
    high = through(jet * (hiss + puff), needle() * TOP)
    near = high + (ring + plips()) * voltage_ratio(np.array([[1.5], [-1.5]])) + froth()
    return low + walls(near) + motor() + pump() + kitchen()


def low_pass(x):
    return signal.sosfilt(signal.butter(12, 17130, fs=SR, output="sos"), x)


def record(dry):
    treble = 1 / (1 + (6600 / (HZ + 1)) ** 14) / (1 + (HZ / 16900) ** 80)
    half = np.pi * HZ * 268e-6 - .38
    port = treble * np.exp(-1j * half)
    mid, side = np.cos(half), -1j * np.sin(half)
    kept = through(dry[0], port * np.array([mid + side, mid - side]))
    least = .36 + .2 * (HZ > 12000)
    mid, side = (v * np.clip((abs(v) - least) / .06, .03, 1) for v in (mid, side))
    top = through(dry[0], port * TOP * np.array([mid + side, mid - side]))
    energy = kept[0] ** 2
    sudden = uniform_filter1d(energy, size=128) / (uniform_filter1d(energy, size=2048) + 1e-12) > 3.3
    sudden = np.clip(12 * uniform_filter1d(1. * sudden, size=900), 0, 1)
    sound = through(dry, 1 / (1 + (HZ / 6600) ** 14)) + top + sudden * (kept - top)
    sound = np.tanh(.4 * sound) / .4
    return low_pass(sound)


dry = scene()
out = record(dry)
to_wav(out)
```